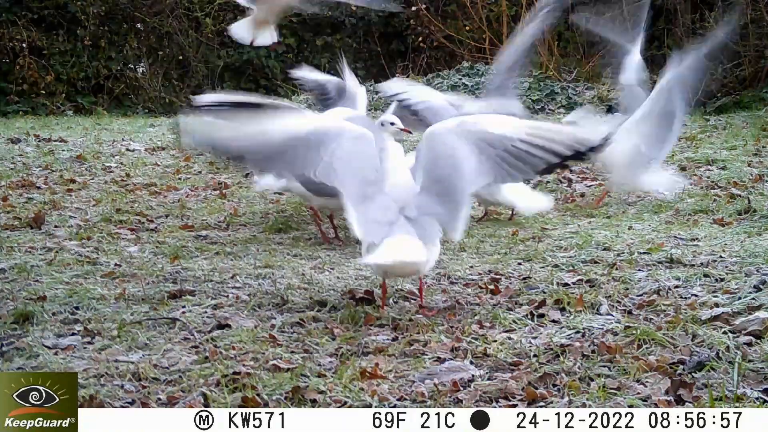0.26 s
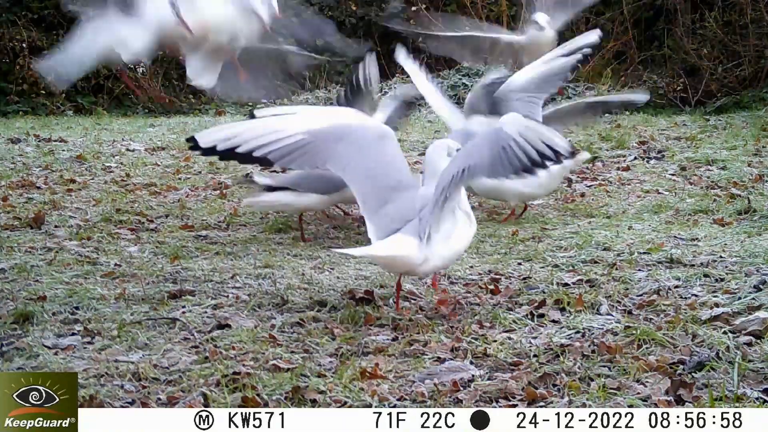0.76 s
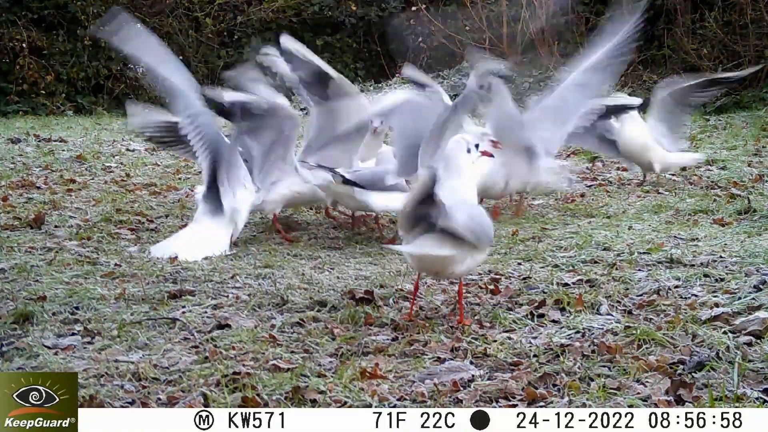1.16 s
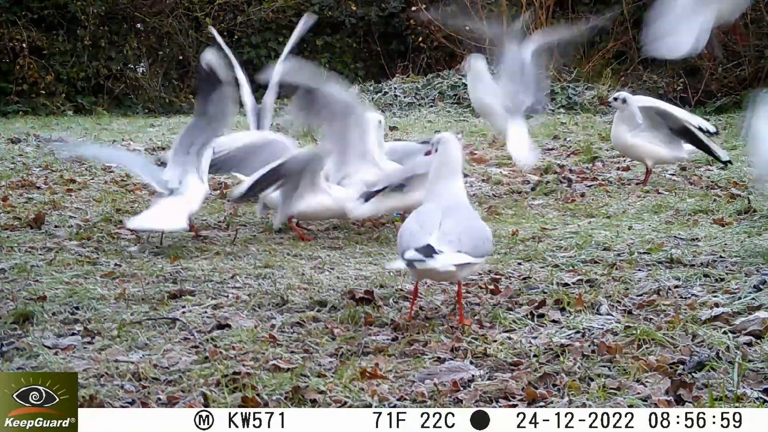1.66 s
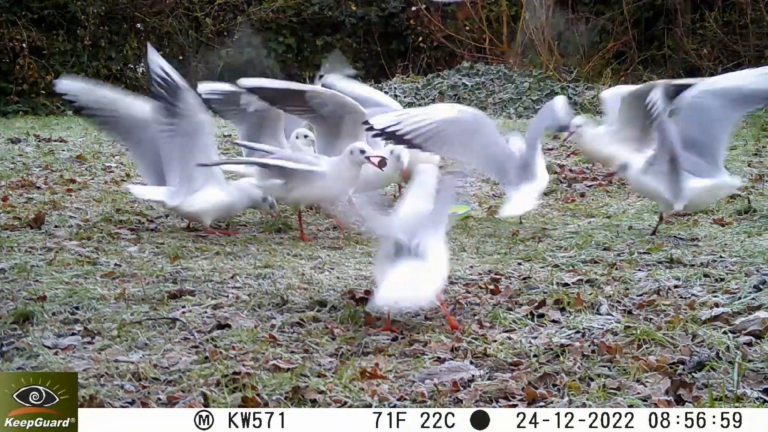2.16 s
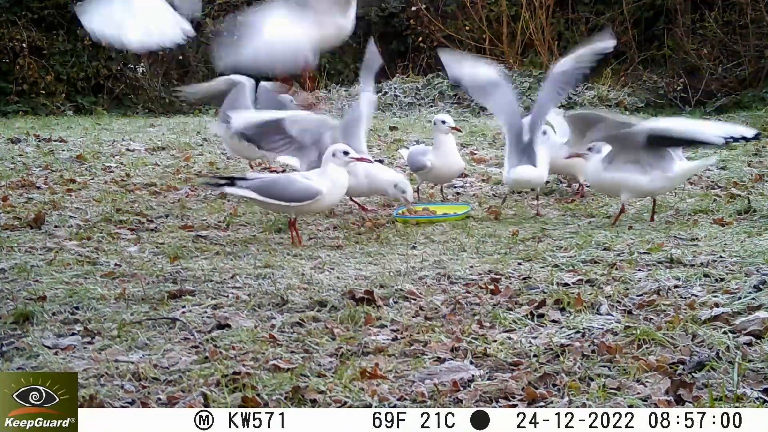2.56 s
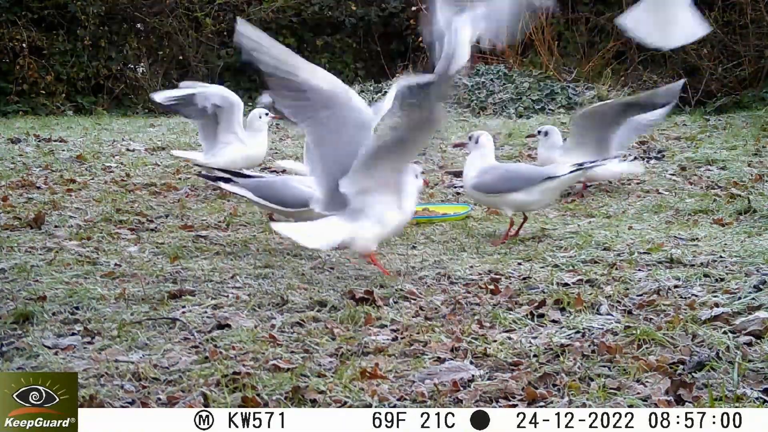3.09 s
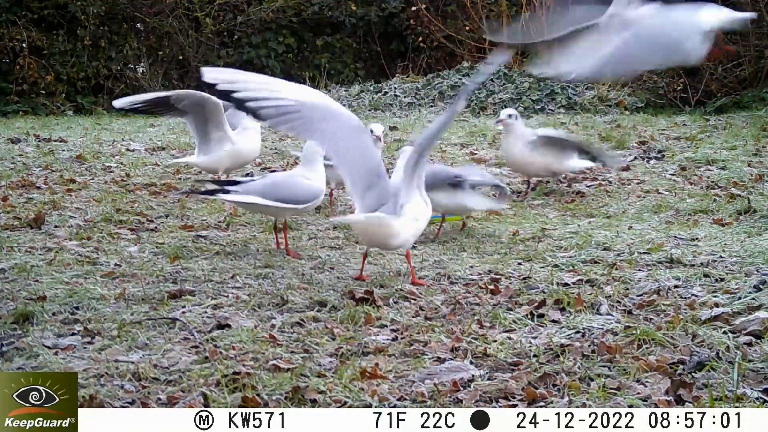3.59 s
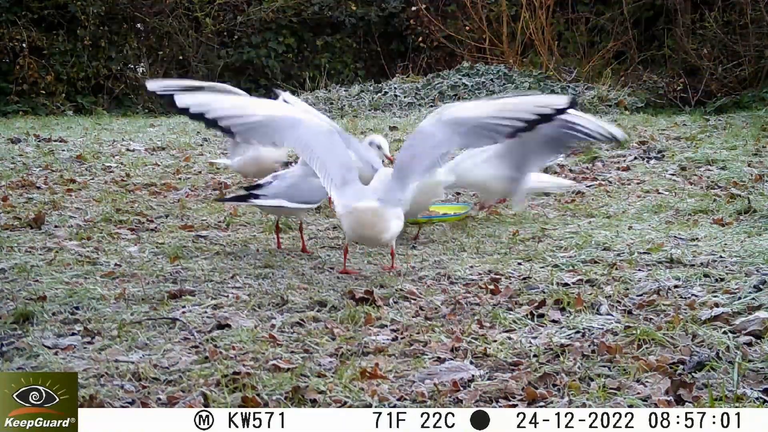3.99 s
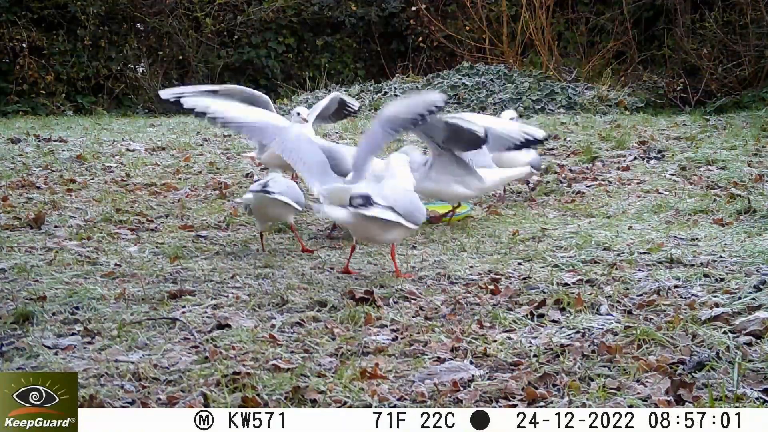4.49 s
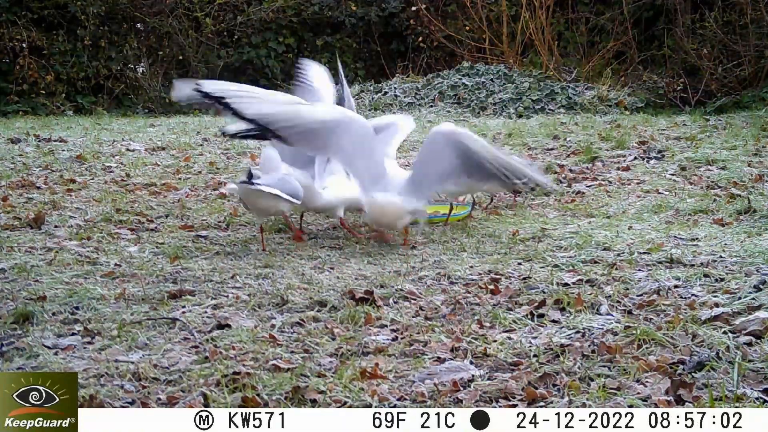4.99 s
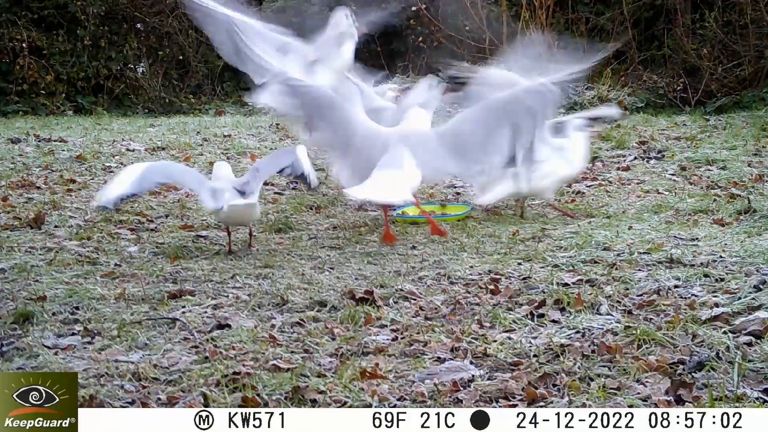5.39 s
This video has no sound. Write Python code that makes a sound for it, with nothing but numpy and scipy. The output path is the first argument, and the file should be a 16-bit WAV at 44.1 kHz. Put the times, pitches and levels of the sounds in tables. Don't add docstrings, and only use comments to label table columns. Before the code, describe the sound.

Several small gulls jostle around a dish on a frosty lawn. Deep air buffeting and feather rustle run throughout. Harsh, rattling cries come mostly in the first three seconds, with quick dish knocks clustered around the first second. Short low keks and a thin whistle follow, then the middle quietens before knocks and a last cluster of cries. Close outdoor microphone, dull treble, slight hedge echo.

```python
import sys
import numpy as np
from scipy import signal
from scipy.fft import rfft, irfft, next_fast_len
from scipy.io import wavfile
from scipy.ndimage import uniform_filter1d, map_coordinates

SR = 44100
rng = np.random.default_rng(int(sys.argv[2]) if len(sys.argv) > 2 else 0)


def to_wav(sig):
    pcm = np.clip(np.atleast_2d(sig), -1, 1) * 32767
    pcm = np.round(pcm).astype(np.int16)
    wavfile.write(sys.argv[1], SR, pcm.T)


def decibels_to_gain(level_db):
    exponent = np.asarray(level_db, float) / 20
    return 10 ** exponent


N = 249165

# time in seconds, draught at the microphone in dB, bustle of feathers in dB.
FLOCK = [(0.0, -18, -43), (.28, -29.5, -49.5), (.52, -21, -50), (.72, -20.5, -57.5), (1.04, -27, -39),
         (1.45, -31.5, -40), (1.6, -29, -50.5), (1.98, -29, -40.5), (2.4, -24, -49.5), (2.75, -28, -53.5),
         (3.07, -25, -39.5), (3.29, -33, -37.5), (3.43, -26, -50), (3.95, -38, -52), (4.35, -33, -56),
         (4.75, -31, -55.5), (5.1, -35.5, -54), (5.65, -22, -46.5)]
# time in seconds, half-length in seconds, whoosh in dB, rustle in dB.
STROKES = [(.01, 0.018, -39.5, -57), (0.544, 0.022, -44.5, -47), (0.701, 0.034, -54.5, -43),
           (0.854, 0.04, -61.5, -31), (1.028, 0.046, -45.5, -64), (1.574, 0.012, -43, -67),
           (1.76, 0.18, -44, -53.5), (1.812, 0.02, -39, -35), (2.234, 0.02, -55, -50),
           (2.41, 0.0053, -39.5, -52), (2.46, 0.0061, -55, -43.5), (2.4, 0.22, -57, -58.5),
           (2.595, 0.11, -48.5, -44.5), (2.818, 0.039, -49.5, -36), (3.104, 0.025, -50.5, -73),
           (3.98, 0.032, -60.5, -75), (4.302, 0.21, -67, -54), (4.792, 0.03, -67, -53),
           (5.006, 0.049, -60, -44.5), (5.156, 0.014, -71, -45), (5.306, 0.012, -46.5, -83),
           (5.481, 0.0096, -69, -46)]
# time in seconds, peak in dB, frequency in Hz, sign.
PUSHES = [(.52, -17, 22, -1), (.549, -11, 52, 1), (.8, -22, 25, 1), (1.512, -24, 35, -1),
          (1.636, -18, 50, -1), (2.48, -20, 45, 1), (2.68, -20, 40, 1), (3.075, -20, 45, 1),
          (5.085, -23, 40, -1), (5.303, -19, 32, 1), (5.373, -26, 65, -1), (.118, -23, 55, -1)]
# frequency in Hz, level in dB per Hz.
BUFFET = [(2, -20.5), (5, 5.5), (16, -1), (25, -2.5), (50, -18), (150, -62.5)]
EDDIES = [(25, -20.5), (55, 4.5), (100, -3.5), (200, -42.5)]
WHOOSH = [(60, -29), (130, 6), (250, 0.5), (500, -4), (1000, -18.5), (3000, -38)]
RUSTLE = [(200, -28), (500, 7.5), (1200, 7), (2500, -1.5), (4000, -9), (8000, -1.5)]
WHOOSH_DB, WHOOSH_SHARE = -13.5, 0.43
SHIVER_DB, GUSTY_DB = 2.2, 2.8

# time in seconds, peak in dB, thud in dB, sharpness in dB.
KNOCKS = [(0.084, -36, -39, 6), (.111, -22.5, -23, -20), (0.152, -30, -27, -1), (0.188, -20, -31, -11),
          (0.256, -25.5, -27.5, -5), (0.401, -29, -33, 1.5), (0.593, -14, -27, -13), (0.796, -21, -23.5, 1),
          (0.818, -21.5, -28, -5), (0.786, -32.5, -39, 3), (1.011, -38, -25, -1), (1.041, -23, -21, -14),
          (1.0, -15.5, -31, -4), (1.053, -19.5, -23, -3), (1.569, -14, -18, -2.5), (1.581, -41, -20, 23.5),
          (1.674, -36, -21.5, 9), (1.949, -23.5, -18, -8), (2.775, -25, -17, -1), (1.172, -24, -23, 0.5),
          (4.45, -32, -23, -6), (3.673, -23.5, -34, -0.5), (3.689, -33.5, -17, 5.5), (3.968, -19, -55, -2),
          (4.117, -22, -28, -8), (4.374, -34, -20, -16), (4.479, -45, -29.5, -6), (4.554, -40.5, -13, 10),
          (4.779, -24.5, -18, 0), (5.14, -12, -24, -15), (5.225, -32, -18, -3), (5.248, -28.5, -32.5, -12),
          (5.39, -30, -21, 8), (5.461, -32, -12.5, 2), (5.603, -24.5, -24, -6)]
# time in seconds, peak in dB, frequency in Hz.
TICKS = [(.797, -25, 2600), (.8185, -29, 2300), (2.499, -28, 2400), (2.853, -28, 2600), (2.896, -33, 3100),
         (3.243, -28, 2100), (3.968, -23, 2300), (4.342, -36, 2000)]
TICK_T60_S = .005

# crest in seconds, rise in seconds, fall in seconds, level in dB, crest pitch in Hz.
CRIES = [(0.134, 0.037, 0.03, -36, 873), (0.447, 0.0079, 0.012, -52, 902),
         (.478, 0.024, 0.021, -35.5, 1006), (.567, 0.027, 0.038, -34.5, 883),
         (0.868, 0.042, 0.048, -27.5, 983), (1.107, 0.034, 0.032, -33.5, 912),
         (1.225, 0.012, 0.041, -26.5, 1055), (1.32, 0.021, 0.025, -30.5, 934),
         (1.445, 0.056, 0.045, -30.5, 709.3), (1.495, 0.0088, 0.026, -36.5, 543),
         (1.764, 0.055, 0.05, -28, 886), (2.32, 0.038, 0.031, -28.5, 1009),
         (2.558, 0.05, 0.037, -32.5, 888.4), (2.826, 0.046, 0.047, -34.5, 793),
         (3.212, 0.04, 0.027, -34.5, 748), (3.864, 0.038, 0.023, -43, 608.4),
         (4.329, 0.023, 0.023, -42, 710.5), (5.0, 0.027, 0.038, -35.5, 899),
         (5.045, 0.014, 0.019, -40.5, 524), (5.529, 0.011, 0.016, -33.5, 785),
         (5.547, 0.021, 0.025, -32.5, 922), (5.575, 0.018, 0.024, -41, 855),
         (5.606, 0.0057, 0.027, -42, 831)]
CRY_HARSHNESS = [(.25, .14), (.5, .02), (.22, .14), (.3, .3), (.22, .26), (.28, .42), (.14, .14), (.1, .28),
                 (.25, .24), (.6, .05), (.23, .3), (.2, .36), (.3, .36), (.3, .36), (.26, .25), (.6, .02),
                 (.4, .03), (.25, .3), (.24, .04), (.6, .05), (.05, .2), (.65, .05), (.7, .1)]
# chest in dB, brightness in dB, hiss above 5 kHz in dB, flutter depth in dB.
CRY_VOICING = [(-5.5, -1.5, 8.5, 4), (0.5, 12.5, -18, 11), (22, 18, -9.5, 3.5), (-8.5, -3, -1, 3),
               (-15.5, -4.5, -2.5, 5), (7, -1, -6.5, 6), (-8.5, -2, 7, 9), (0, 1, 5, 0), (-2, -8.5, 1, 9),
               (9, -6, 0, 8), (-7, -4, 8, 5), (-4.5, -0.5, 2, 10), (-2, 2, 4.5, 5.5), (1, 1, -11, 6.5),
               (-4, -3, 2, 8), (4.5, -5, -11, 13), (2, -3.5, -13, 2), (6.5, -8.5, -8, 7),
               (-4, -2.5, -10, 8), (6, -2, -7, 5), (-9, -2, -5.5, -0.5), (-5, -6, -7, 7), (5, -0.5, 4, 2)]
# rate in Hz, first gap after the crest in cycles,
# seconds after the crest when the voice breaks into a creak.
CRY_FLUTTER = [(69.7, 0.055, 1), (93, 0.23, 1), (93.5, 0.0095, .012), (91.5, .3, .005), (93.7, 0.24, 1),
               (83.3, 0.5, .006), (82, 0.58, .019), (92, 0.75, .009), (86.4, 0.14, .017), (87, 0.44, 1),
               (97.7, .91, .029), (90.2, .73, .02), (87.8, 0.0087, .011), (82.2, .01, .011),
               (81, 0.13, .015), (81.5, 0.073, 1), (88.5, 0.88, -.001), (82.3, 0.5, .018), (83, 0.066, 1),
               (90, 0.45, 1), (89.4, 0.29, 1), (89, 0.47, 1), (90, 0.35, 1)]
CRY_BEAK_DB = [5, 19, 5.5, 3, 0.1, -8, -6, 11, -5.5, 2, 1.5, -1.5, 0, 9, 5, -2, 2, 3, 0, -1, 3, 7, 6]
# frequency in Hz, gain in dB.
CRY_THROAT = [(300, -17.5), (900, -12.5), (1800, -5.5), (2400, -7.5), (3000, -3), (3900, -6.5), (4800, -13),
              (8000, -13)]
CRY_SWELL, DULL_ENDS_DB = 1.76, 6.5
CRY_GLIDE, WARBLE = 1.45, -.008
CREAK, CREAK_ROUGH = .65, .42
HOARSENING = .25
BEAK_HZ = 2700

# time in seconds, length in seconds, pitch in Hz, level in dB.
FAR_NOTES = [(0.4, 0.03, 690, -60), (1.898, 0.014, 640, -47), (1.949, 0.022, 678, -47.5),
             (2.125, 0.014, 727, -44), (2.448, 0.014, 660, -43), (2.179, 0.035, 589, -51.5),
             (2.23, 0.014, 523, -48), (2.624, 0.044, 621, -49.5), (2.722, 0.023, 980, -58),
             (4.412, 0.037, 925, -58.5), (3.774, 0.061, 3610, -73.5), (4.018, 0.036, 3630, -76),
             (4.483, 0.034, 3680, -78), (4.72, .06, 3680, -84), (5.07, 0.028, 1507, -72)]
# time in seconds, pitch in Hz, level in dB.
LOW_WHISTLE = [(1.003, 1484, -57), (1.05, 1450, -47), (1.082, 1432, -47), (1.093, 1435, -42),
               (1.12, 1483, -44.5), (1.15, 1480, -40), (1.162, 1420, -47)]
HIGH_WHISTLE = [(3.105, 1550, -77), (3.152, 1758, -45.5), (3.21, 1749, -39), (3.25, 1700, -47),
                (3.285, 1636, -42), (3.307, 1460, -44)]
# level in dB, how strongly it follows the effort, fading in dB per second.
WHISTLE_TONES = [(-8, 1.01, -0.5), (5.5, 0.72, 24), (11.5, 0.75, 100.5), (18, 2.2, -3)]

# crest in seconds, rise in seconds, fall in seconds, crest pitch in Hz, level in dB.
KEKS = [(1.247, 0.027, 0.035, 402, -29.5), (1.378, 0.023, 0.031, 390.6, -29.5),
        (1.94, 0.038, 0.018, 345.4, -37.5), (2.092, 0.033, 0.027, 348.4, -36.5),
        (2.998, 0.032, 0.056, 377.5, -29), (3.157, 0.037, 0.028, 342.3, -34.5),
        (3.286, 0.03, 0.028, 351.3, -31.5), (4.106, .016, 0.051, 401.7, -37),
        (4.226, 0.033, 0.063, 386, -32)]
# roughness 0-1, chest in dB, second overtone in dB, brightness in dB,
# pitch sag at the end 0-1.
KEK_VOICING = [(.05, 15, -12, -14, .12), (.03, 15, -8, -19, .06), (.05, -3, -4, -19, .12),
               (.05, 4, -4, -9, .15), (.07, -8, 3, -15, .36), (.06, 2, -4, -14, .24), (.04, 1, -4, -3, .26),
               (.3, 6, -14, -11, .06), (.05, -4, 4, -5, .46)]
# fourth overtone in dB, roughness gained in the tail 0-1,
# how fast the upper overtones fade off the crest.
KEK_COLOUR = [(-8, .1, 3), (-10, 0, 2), (0, 0, 3), (0, 0, 3), (3, .2, 3), (-12, .05, 3), (5, 0, 2.5),
              (-7, .4, .7), (0, .42, 1.6)]
# overtone number, gain in dB.
KEK_THROAT = [(1, -28), (2, -11), (3, 0), (4, -3), (5, 0), (6, -3), (7, -17), (8, 0), (9, -9), (11, -14),
              (14, -22), (22, -30)]
SCOOP = .7
TREMBLE_HZ = 99

# frequency in Hz, time to fall 60 dB in seconds.
HEDGE = [(300, 0.064), (1500, 0.2), (8000, 0.19)]
# frequency in Hz, gain in dB.
HOUSING = [(4000, 0), (4800, -10), (5700, -19.5), (6500, -12), (7300, -8), (7700, -15.5), (8000, -59),
           (8300, -74.5)]
DROPOUTS = [.025, .065, .21, .27, .335, .39, .468, .78, .98, 1.18, 1.552, 2.01, 2.075, 2.495, 2.563, 2.765,
            3.46, 3.92, 4.05, 4.49, 4.75, 4.82, 4.97, 5.315, 5.445, 5.61]


def unit(x):
    return x / np.sqrt(np.mean(x ** 2) + 1e-20)


def along(points, hz):
    f, v = np.transpose(points)
    return np.interp(np.log(hz + 1), np.log(f + 1), v)


def stretch(rows):
    s, *cols = np.transpose(rows)
    t = np.arange(s[0], max(s[-1], s[0] + .01), 1 / SR)
    return round(s[0] * SR), t - s[0], [np.interp(t, s, c) for c in cols]


def add(into, at, x):
    into[at:at + len(x)] += x[:len(into) - at]


def wobble(rate, size):
    knots = rng.standard_normal(int(size * 600 / SR) + 9)
    return map_coordinates(knots, [np.arange(size) * min(rate, 600) / SR])


def coloured(x, gain_db):
    m = next_fast_len(len(x) + 8192) * 2
    c = irfft(np.log(decibels_to_gain(gain_db(np.fft.rfftfreq(m, 1 / SR))) + 1e-6), m)
    c[1:m // 2] *= 2
    c[m // 2 + 1:] = 0
    return irfft(rfft(x, m) * np.exp(rfft(c)), m)[:len(x)]


def fade(t, edge):
    return np.clip(np.minimum(t, t[-1] - t) / edge, 0, 1)


def patchy(x, depth_db):
    z = signal.stft(x, nperseg=512)[2]
    field = uniform_filter1d(uniform_filter1d(rng.standard_normal(z.shape), 5, 0), 4, 1)
    return signal.istft(z * decibels_to_gain(depth_db * unit(field)), nperseg=512)[1][:len(x)]


def wings():
    whole = [(0, *FLOCK[0][1:]), *FLOCK[1:-1], ((N + 9) / SR, *FLOCK[-1][1:])]
    draught_db, bustle_db = [column[:N] for column in stretch(whole)[2]]
    whoosh = decibels_to_gain(WHOOSH_DB + WHOOSH_SHARE * draught_db + (1 - WHOOSH_SHARE) * bustle_db)
    swells = np.array([np.exp(-((np.arange(N) / SR - s) / half) ** 2) for s, half, *_ in STROKES])
    stroke_whoosh, stroke_rustle = decibels_to_gain(np.transpose(STROKES)[2:]) @ swells
    whoosh = whoosh + stroke_whoosh
    rustle = decibels_to_gain(bustle_db) + stroke_rustle

    noise = lambda shape: unit(coloured(rng.standard_normal(N), lambda f: along(shape, f)))
    out = decibels_to_gain(draught_db + 1.4 * wobble(8, N)) * noise(BUFFET)
    out += decibels_to_gain(draught_db - 19.5 + 1.4 * wobble(18, N)) * noise(EDDIES)
    out += whoosh * decibels_to_gain(GUSTY_DB * wobble(40, N) + 3.06 * wobble(120, N)) * noise(WHOOSH)

    tick_db = 5.8 * np.minimum(rng.exponential(size=N), 2.5)
    ticks = rng.standard_normal(N) * decibels_to_gain(tick_db) * (rng.random(N) < .01)
    grain = patchy(rng.standard_normal(N), 3.2) + .4 * unit(ticks)
    out += rustle * decibels_to_gain(SHIVER_DB * wobble(24.47, N)) * unit(coloured(grain, lambda f: along(RUSTLE, f)))

    t = np.linspace(-.06, .06, round(.12 * SR))
    for s, db, hz, sign in PUSHES:
        u = (np.pi * hz * t) ** 2
        add(out, round((s - .06) * SR), sign * decibels_to_gain(db) * (1 - 2 * u) * np.exp(-u))
    return out


def knocks():
    out, t = np.zeros(N), np.arange(SR // 20) / SR
    for s, db, thud_db, sharp_db in KNOCKS:
        blow = 0.54 * rng.standard_normal(len(t)) * decibels_to_gain(-60 * t / 0.028) * (t > .0008)
        blow[:5] -= 1.56 * np.hanning(7)[1:-1]
        dish = [(100, thud_db - 9.0), (500, thud_db + 24.5), (1400, 0),
                (4500, sharp_db - 13.0), (8000, sharp_db - 7.5)]
        add(out, round(s * SR), decibels_to_gain(db + 6.0) * coloured(blow, lambda f: along(dish, f)))
    for s, db, hz in TICKS:
        add(out, round(s * SR), decibels_to_gain(db - 60 * t / TICK_T60_S) * np.sin(2 * np.pi * hz * t))
    return out


def voice(gain, hz, throat_db, rough, chest_db, bright_db, effort):
    phase = 2 * np.pi * np.cumsum(hz * (1 + .09 * rough * wobble(500, len(hz)))) / SR
    k = np.arange(1, 28)[:, None]
    waver_db = np.array([(1.2 + 3.5 * rough) * wobble(70, len(hz)) for _ in k])
    pulses = unit(np.sum(decibels_to_gain(waver_db) * np.cos(k * phase) * (k * hz < 8200), axis=0))
    breath = unit(rng.standard_normal(len(hz)) * (1 + np.cos(phase)))
    source = np.sqrt(1 - rough) * pulses + np.sqrt(rough) * breath

    under = lambda f, edge_hz: -10 * np.log10(1 + ((f + 1) / edge_hz) ** 12)
    over = lambda f, edge_hz: under(edge_hz, f + 1)
    chest = unit(coloured(source, lambda f: throat_db(f) + under(f, 1104)))
    middle = unit(coloured(source, lambda f: throat_db(f) + over(f, 1224) + under(f, 2017)))
    bright = unit(coloured(source, lambda f: throat_db(f) + over(f, 2270)))
    share = 1 / np.sqrt(1 + decibels_to_gain(2 * chest_db))
    body = share * (decibels_to_gain(chest_db) * chest + effort * middle)
    return gain * (body + decibels_to_gain(bright_db) * effort ** 2 * bright)


def cries():
    out = np.zeros(N)
    for cry, harshness, voicing, flutter, beak_db in zip(
            CRIES, CRY_HARSHNESS, CRY_VOICING, CRY_FLUTTER, CRY_BEAK_DB):
        s, rise, fall, db, crest_hz = cry
        rough, sag = harshness
        chest_db, bright_db, hiss_db, depth_db = voicing
        flap_hz, lag, breaks = flutter
        t = np.arange(-rise, fall, 1 / SR)
        away = lambda u: np.clip(np.where(u < 0, -u / rise, u / fall), 0, 1)
        off = away(t)

        flaps = flap_hz * t - lag + .1 * rough * wobble(60, len(t))
        slip, size = rng.standard_normal((2, 40))[:, np.clip(flaps + 12, 0, 39).astype(int)]
        freeze = np.clip(depth_db / 14, 0, .55)
        held = t + freeze * (np.floor(flaps) + .5 - flaps) / flap_hz
        glide_hz = crest_hz * (1 - sag * away(held) ** CRY_GLIDE)
        hz = np.where(t < breaks, glide_hz, CREAK * crest_hz)
        hz = hz * (1 + .12 * rough * slip - WARBLE * np.sin(2 * np.pi * flaps))

        chop_db = -1.6 * depth_db * ((1 + np.cos(2 * np.pi * flaps)) / 2) ** 4 + 1.2 * wobble(250, len(t))
        chop = unit(decibels_to_gain(chop_db + uniform_filter1d(0.22 * size, size=60)))
        gain = decibels_to_gain(db) * (1 - off ** CRY_SWELL) * chop
        beak = lambda f: beak_db / (1 + ((f - BEAK_HZ) / 450) ** 2)
        throat_db = lambda f: along(CRY_THROAT, f) + beak(f) + hiss_db * (f > 5200)
        hoarse = np.minimum(rough + HOARSENING * off, np.where(t < breaks, .85, CREAK_ROUGH))
        sung = voice(gain, hz, throat_db, hoarse, chest_db, bright_db - DULL_ENDS_DB * off, 0.99)
        add(out, round((s - rise) * SR), sung)
    return out


def whistles():
    out = np.zeros(N)
    for s, length, hz, db in FAR_NOTES:
        t = np.arange(0, max(length, .01), 1 / SR)
        unsteady = .07 * np.sqrt(700 / hz) * wobble(300, len(t))
        phase = 2 * np.pi * np.cumsum(hz * (1 + unsteady)) / SR
        add(out, round(s * SR), decibels_to_gain(db + 12) * np.sqrt(np.abs(np.sin(np.pi * t / t[-1]))) * np.sin(phase))

    at, t, (hz, db) = stretch(LOW_WHISTLE)
    phase = 2 * np.pi * np.cumsum(hz) / SR
    tones = np.sin(phase) + decibels_to_gain(-16) * np.sin(2 * phase)
    add(out, at, fade(t, 0.0037) * decibels_to_gain(db + 9.0 + 1.8 * wobble(90, len(t))) * tones)

    at, t, (hz, db) = stretch(HIGH_WHISTLE)
    phase = 2 * np.pi * np.cumsum(hz * (1 + 0.0081 * wobble(200, len(t)))) / SR
    peak_db = db.max()
    tones = np.zeros(len(t))
    for k, (up_db, follows, fading_db) in enumerate(WHISTLE_TONES):
        tone_db = peak_db + up_db + follows * (db - peak_db) - fading_db * t
        tones += decibels_to_gain(tone_db) * np.sin((k + 1) * phase)
    add(out, at, fade(t, 0.0025) * decibels_to_gain(1.5 * wobble(128.7, len(t))) * tones)
    return out


def keks():
    out = np.zeros(N)
    for kek, voicing, colour in zip(KEKS, KEK_VOICING, KEK_COLOUR):
        s, rise, fall, hz, db = kek
        rough, chest_db, second_db, bright_db, sag = voicing
        fourth_db, hoarse, fading = colour
        t = np.arange(-rise, fall, 1 / SR)
        arch = 1 - np.where(t < 0, t / rise, t / fall) ** 2
        off = np.abs(1 - arch)
        pitch = hz * (1 - sag * np.where(t < 0, SCOOP, 1) * off ** 1.35)
        second = lambda f: second_db * (f < 2.3 * hz)
        fourth = lambda f: fourth_db * (np.abs(f / hz - 3.9) < .45)
        throat_db = lambda f: along(KEK_THROAT, f / hz) + second(f) + fourth(f)
        tremble_db = 3.5 * (rough > .15) * np.cos(2 * np.pi * TREMBLE_HZ * (t + .003))
        gain = decibels_to_gain(db + tremble_db + .7 * wobble(120, len(t))) * np.abs(arch) ** .45
        roughness = rough + hoarse * (t > 0) * off ** .5
        sung = voice(gain, pitch, throat_db, roughness, chest_db, bright_db, np.abs(arch) ** fading)
        add(out, round((s - rise) * SR), sung)
    return out


def hedge(x):
    out, step = np.zeros(N), SR // 3
    for at in range(0, N, step):
        hz, t, z = signal.stft(rng.standard_normal(SR // 4), SR, nperseg=256)
        tail = signal.istft(z * decibels_to_gain(-60 * t / along(HEDGE, hz)[:, None]), SR, nperseg=256)[1]
        echo = signal.fftconvolve(x[at:at + step], tail / np.linalg.norm(tail))
        add(out, min(at + 200, N - 1), echo)
    return out


def scene():
    moving_air = wings()
    near = knocks() + cries() + whistles() + keks()
    return (near + decibels_to_gain(-12.5) * hedge(near) + moving_air)[None]


def roll_off(x):
    return signal.sosfilt(signal.butter(12, 8780, fs=SR, output="sos"), x)


def record(dry):
    heard = coloured(dry[0], lambda f: along(HOUSING, f))
    band = signal.butter(5, [4700, 7100], "band", fs=SR, output="sos")
    treble = signal.sosfiltfilt(band, heard)
    starved = np.max([np.exp(-((np.arange(N) / SR - s) / .007) ** 4) for s in DROPOUTS], axis=0)
    mix = heard - starved * treble - .0005
    return roll_off(mix[None])


dry = scene()
out = record(dry)
to_wav(out)
```